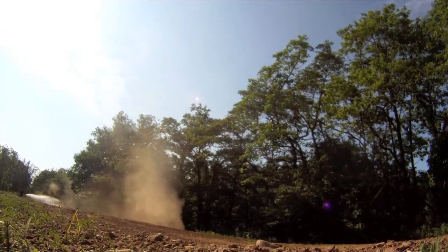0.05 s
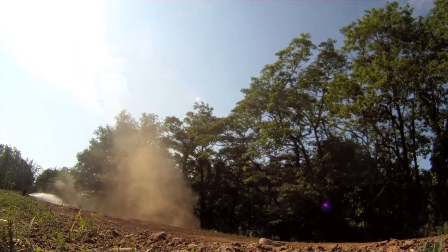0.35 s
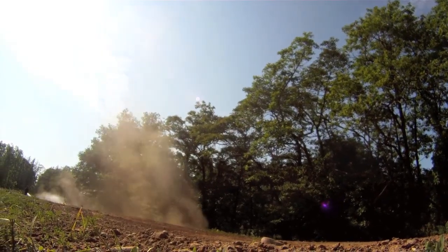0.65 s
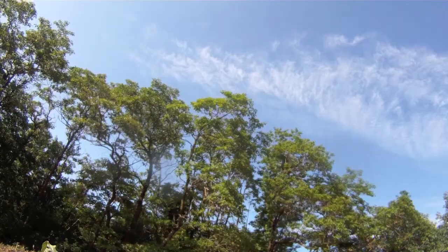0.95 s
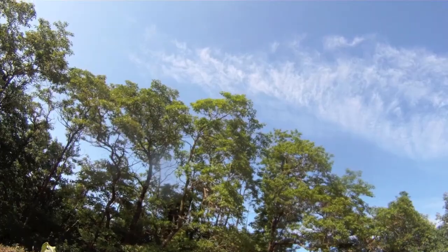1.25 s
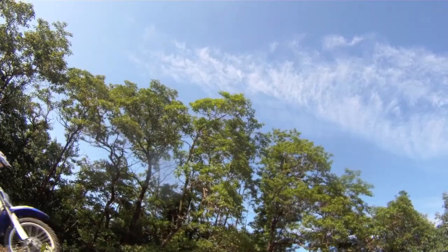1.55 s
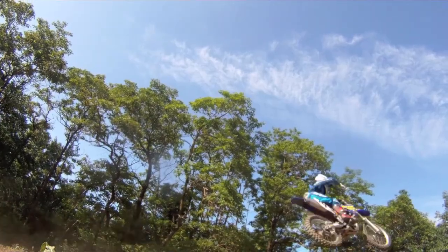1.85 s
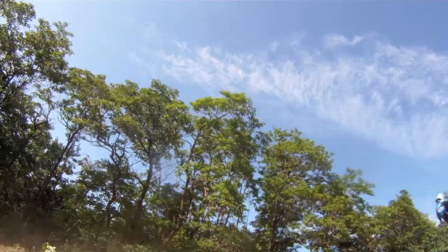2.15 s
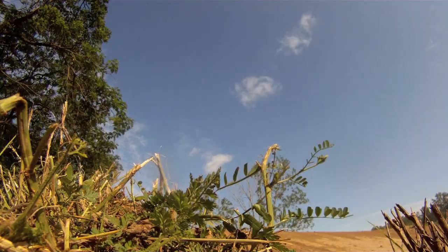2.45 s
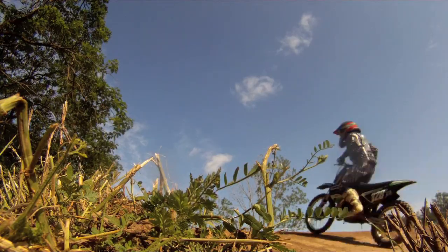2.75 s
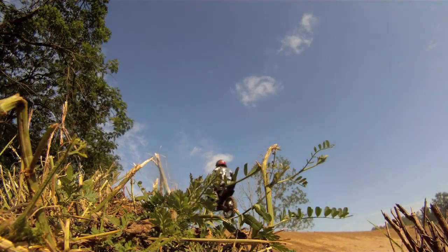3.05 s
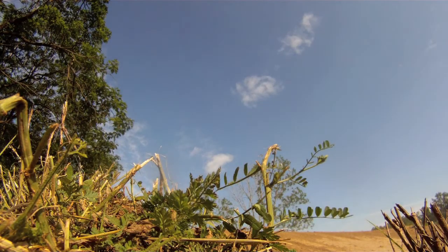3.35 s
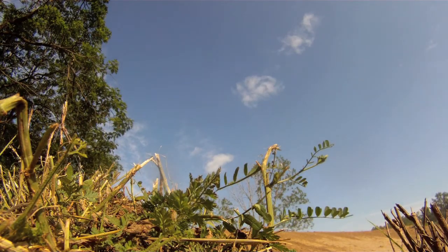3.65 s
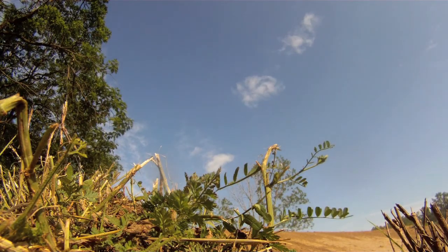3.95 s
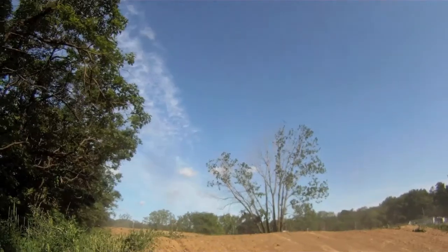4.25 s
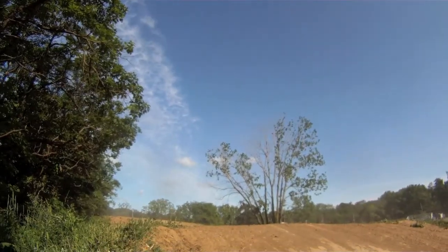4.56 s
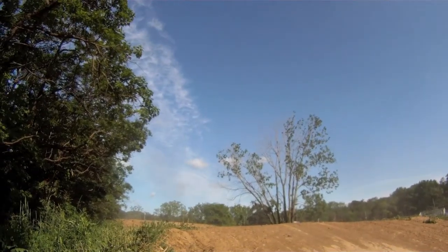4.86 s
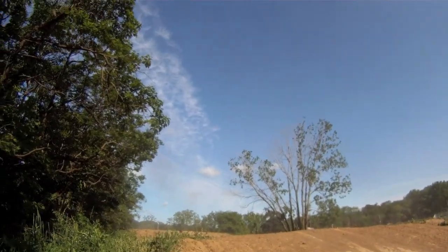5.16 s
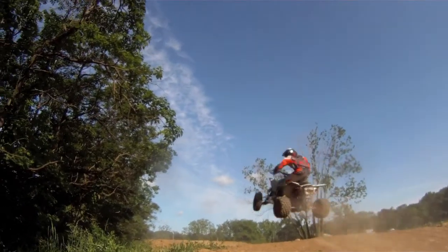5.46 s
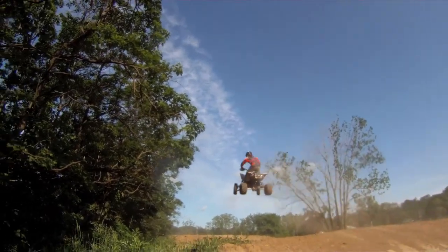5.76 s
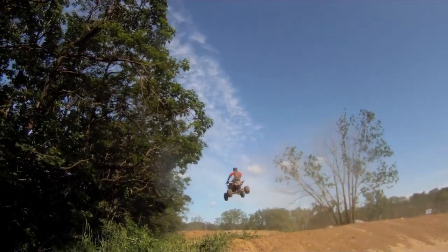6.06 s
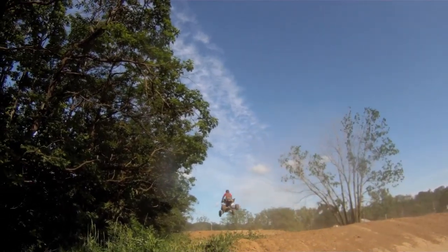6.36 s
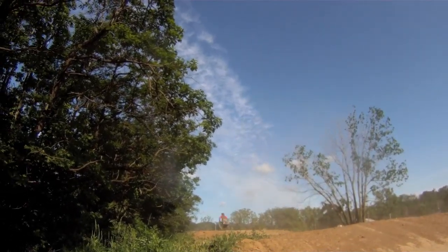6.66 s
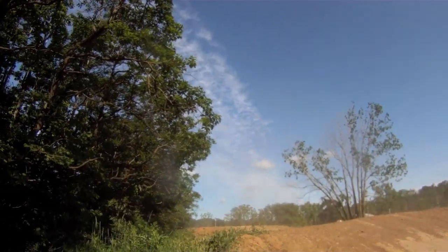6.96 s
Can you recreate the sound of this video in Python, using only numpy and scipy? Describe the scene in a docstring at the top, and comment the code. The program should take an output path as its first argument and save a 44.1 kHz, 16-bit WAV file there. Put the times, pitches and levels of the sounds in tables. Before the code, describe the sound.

Four short outdoor scenes of thumping, raspy single-cylinder engines, heard from ground level with gusts of low rumble and a faint echo from trees. First a dirt bike leaves amid pattering clods, then one knocks over a jump and winds down, and another passes at higher revs while a distant one drones. Finally a quad swells to a close roar, clacks off a ramp and pulls away, revving and popping.

```python
"""A dirt bike rolls off, blipping its throttle as clods fall. In three more short scenes a bike jumps,
one passes with another far behind, and a quad drives up, leaps and barks away. Each engine has a single
cylinder: every firing gives a low thump in the pipe and a sharp crack at its mouth, over metal clatter.
All is heard close to the ground, with rumbling air, faint scatter from a wood and a treble coloured by
the resonances of a camera's plastic case."""
import sys
import numpy as np
from scipy import signal
from scipy.fft import rfft, irfft
from scipy.io import wavfile
from scipy.ndimage import uniform_filter1d, map_coordinates

SR = 44100
rng = np.random.default_rng(int(sys.argv[2]) if len(sys.argv) > 2 else 0)


def digitize_waveform(pressure):
    """Quantize a signal to 16-bit integers and store it at the path in sys.argv[1].

    Rows of a 2-D input are taken as channels; values are limited to [-1, 1].
    """
    field = np.atleast_2d(pressure).T
    bounded = np.clip(field, -1, 1)
    quanta = np.round(bounded * 32767).astype(np.int16)
    wavfile.write(sys.argv[1], SR, quanta)


N = 313992
T = np.arange(N) / SR
HZ = np.fft.rfftfreq(8192, 1 / SR)

# Swells of ground rumble and wind. Each row: centre in seconds, level in dB, half width in seconds.
RUMBLE_SWELLS = [(0.02, -27.5, 0.06), (1.35, -36.5, 0.051), (2.66, -49, 0.13), (4.28, -43, 0.082),
                 (5.12, -33.5, 0.25), (6.4, -46, 0.46)]
# Spectrum of the rumble. Each row: frequency in Hz, relative gain in dB.
RUMBLE_SPECTRUM = [(15, -27), (35, -13), (75, -4), (130, -5.5), (250, -11), (700, -43)]
# Clods and stones landing. Each row: start in seconds, peak in dB, nominal pitch in Hz.
CLOD_FALLS = [(.125, -14.5, 1050), (.180, -17.5, 1110), (0.292, -23, 1130), (0.343, -30, 1200),
              (.387, -27.5, 1080), (.532, -23.5, 1000), (0.54, -27.5, 1040), (0.597, -31, 1160),
              (0.848, -47, 1100)]
# Wheels hitting the ramp. Each row: start in seconds, thud level in dB, thud pitch in Hz,
# thud decay in seconds, clack peak in dB.
RAMP_HITS = [(1.327, -30, 115, 0.021, -16.5), (1.35, -20.5, 91, 0.024, -42), (5.191, -19, 122, 0.025, -9.5)]
# Resonances of the case. Each row: frequency in Hz, nominal width in Hz, relative gain in dB.
CASE_MODES = [(7090, 1060, -8.5), (8360, 830, -4.5), (8870, 280, -4), (9650, 210, 4), (9880, 480, 3),
              (10830, 170, -5), (11490, 570, -14.5), (12350, 300, -32.5), (13130, 250, -6.5),
              (14500, 630, -12), (14200, 680, 1), (15000, 380, -18)]
# Engine speeds. Each row: time in seconds, firings per second.
ROLLING_RATE = [(0, 54.3), (.19, 52.4), (.32, 47.1), (.55, 40.8), (.63, 44.2), (.73, 44.5), (.87, 49.3),
                (.945, 48.5)]
JUMPING_RATE = [(.945, 97.3), (1.1, 84.4), (1.28, 72.8), (1.4, 88.6), (1.48, 85.3), (1.75, 64.2),
                (1.98, 51), (2.37, 37.1), (2.445, 42)]
PASSING_RATE = [(2.445, 129.2), (2.55, 123), (2.78, 107.7), (2.85, 100.7), (2.97, 99.1), (3.1, 93.7),
                (3.55, 83.14), (4.075, 76.6)]
FAR_RATE = [(2.445, 87), (3.03, 91.9), (3.14, 98.2), (3.26, 72.4), (3.38, 60.1), (3.57, 78.1),
            (3.73, 71.05), (3.86, 83), (4.075, 76.7)]
QUAD_IN_RATE = [(4.075, 97), (4.26, 97.4), (4.41, 86), (4.7, 86), (4.83, 84.6), (5.04, 87.7), (5.22, 75),
                (5.39, 61.3), (5.465, 68.9)]
QUAD_OUT_RATE = [(5.451, 67), (5.527, 74), (5.6, 85), (5.76, 78.3), (6.06, 60.4), (6.21, 92), (6.44, 91),
                 (6.51, 85), (6.65, 92.4), (6.82, 92.8), (6.89, 70), (6.97, 74.5), (7.12, 76)]
# Rides as they near and leave. Each row: time in seconds, base thump level in dB, base rasp level in dB,
# exhaust share of the rasp from 0 to 1 (high when the pipe faces the listener).
ROLLING_RIDE = [(0, -40.5, -33, 1), (.09, -33.5, -37, 0.42), (.21, -33.5, -38, .5), (.42, -38, -52.5, 0.42),
                (.6, -41, -54.5, .25), (.74, -41, -54.5, 0.75), (.85, -42, -53.5, 0.39),
                (.94, -42, -46, 0.21)]
JUMPING_RIDE = [(.95, -41, -38, 0.14), (1.28, -40, -35, 0.27), (1.46, -31.5, -32, .03),
                (1.62, -30, -32.5, .02), (1.77, -33.5, -34, .08), (1.96, -36, -43, .12),
                (2.16, -41.5, -52.5, .03), (2.36, -46, -57.5, .06), (2.445, -33, -46, 0.089)]
PASSING_RIDE = [(2.45, -53, -37, .1), (2.54, -36.5, -34, 0.18), (2.82, -56, -42, 0.38),
                (3.1, -80, -42.5, .24), (3.23, -76, -51.5, .08), (3.45, -74, -54.5, .08),
                (4.07, -63, -55, 0.16)]
QUAD_IN_RIDE = [(4.08, -48, -36, 0.071), (4.4, -41, -36.5, 0.042), (4.72, -34, -36, 0.048),
                (4.94, -31, -26, .06), (5.09, -23.5, -20.5, .06), (5.22, -11.5, -20, .08),
                (5.256, -23, -20, .84), (5.421, -15.5, -21.5, 0.76), (5.455, -29, -34, .8)]
QUAD_OUT_RIDE = [(5.45, -28, -25, 0.94), (5.63, -35.5, -22.5, 0.95), (5.74, -30.5, -21, 0.75),
                 (5.93, -32.5, -32, 0.57), (6.15, -32, -28, 0.9), (6.33, -36.5, -29.5, 0.82),
                 (6.522, -29.5, -26.5, .55), (6.739, -34, -37.5, 0.11), (6.902, -34, -33.5, 0.03),
                 (7.12, -34, -35, 0.012)]
# Responses of silencer and pipe. Each row: frequency in Hz, relative gain in dB.
ROLLING_EXHAUST = [(24, -64), (40, -11), (113, -9.5), (160, 2.5), (358, -8.5), (458, -16), (527, -12.5),
                   (664, -18.5), (728, -13.5), (904, -15.5), (1050, -9), (1370, -20), (1600, -19.5),
                   (2080, -56), (3520, -120)]
JUMPING_EXHAUST = [(24, -68), (40, -36), (70, -12), (98, -13), (146, 3), (280, -18.5), (326, -10.5),
                   (431, -20.5), (503, -14.5), (717, -14.5), (824, -19.5), (1050, -7.5), (1600, -23.5),
                   (2080, -52), (3520, -120)]
PASSING_EXHAUST = [(40, -8), (75, 18), (150, -15), (230, 0), (290, -5), (400, 8.5), (500, -4), (690, -4.5),
                   (900, -13.5), (1190, -2), (1500, -23)]
FAR_EXHAUST = [(40, -17), (75, -6), (120, -2.5), (180, 4.5), (270, -2.5), (400, -19), (900, -20),
               (2000, -49)]
QUAD_IN_EXHAUST = [(40, -40), (62, -41), (82, -3), (118, -10.5), (165, 0), (205, 7), (300, -1.5),
                   (350, -3.5), (430, -3), (540, -10), (800, -9.5), (1040, -13.5), (1290, -18.5),
                   (1600, -13)]
QUAD_OUT_EXHAUST = [(24, -80), (40, -53), (75, -9.5), (120, -1), (176, 4), (209, 6.5), (369, 2.5),
                    (634, -6), (775, -9), (947, -10), (1010, 0.5), (1120, -9), (1480, -10.5), (1600, -6.5),
                    (2080, -4), (3520, -120)]
# Bright ring of each machine. Each row: frequency in Hz, relative gain in dB.
ROLLING_METAL = [(820, -36), (1400, -23), (1660, -11), (1830, -20), (2010, 5), (2130, 2), (2470, 1.5),
                 (2720, -21), (3070, -3), (3320, -13), (3820, -6), (4190, -21), (5280, -18.5), (6000, -45),
                 (7800, -76), (13200, -120)]
JUMPING_METAL = [(820, -51), (1400, -4.5), (1760, -10), (2050, 3.5), (2260, 6), (2570, -1.5), (2790, -9),
                 (3220, -9), (3640, -7), (4090, -15), (4400, -12.5), (4790, -17), (5220, -12), (6000, -26),
                 (7800, -44), (13200, -120)]
PASSING_METAL = [(820, -64), (1400, -11), (1520, -24), (1690, -3.5), (1830, -15), (1960, -5.5), (2070, 3.5),
                 (2360, -5.5), (2560, -12.5), (2750, -25), (2890, -16.5), (3620, -12.5), (4160, -24),
                 (5220, -22.5), (6000, -40), (7800, -74), (13200, -120)]
QUAD_IN_METAL = [(820, -65), (1400, -14), (1590, -10.5), (1880, 5.5), (2040, 6.5), (2320, 5.5),
                 (2560, -2.5), (2740, -11.5), (3280, -3.5), (3890, -9.5), (4240, -15), (5060, -14),
                 (6000, -32), (7800, -73), (13200, -120)]
QUAD_OUT_METAL = [(820, -64), (1400, -11), (1520, -15), (1650, -1.5), (1760, -1), (1990, 0.5), (2280, -5),
                  (2560, -2), (2800, -15.5), (3130, -10), (3550, -16.5), (5090, -24.5), (5580, -26),
                  (6000, -36), (7800, -99), (13200, -120)]
# Uneven combustion. Each entry: name of the ride, base roughness from 0 to 1.
ROUGHNESS = {"rolling": .25, "jumping": .3, "passing": .68, "quad in": .5, "quad out": .38}
# Exhaust bangs. Each row: time in seconds, nominal boost in dB, span of misfiring before it in seconds.
EXHAUST_BANGS = [(.762, 4.5, 0), (5.2536, 2, 0), (5.2684, 2, 0), (5.481, 5, 0), (5.495, 7.5, 0),
                 (5.523, 6, 0), (5.597, 4, 0), (5.634, 2, .028), (6.028, 10, 0), (6.091, 3.5, .05),
                 (6.136, 3, 0), (6.217, 5.5, .016), (6.2504, 9, .016), (6.285, 5.5, .029), (6.362, 3, .016),
                 (6.394, 6.5, .016), (6.427, 4.5, .016), (6.449, 5.5, .018), (6.471, 7, .016)]
# Throttle twists. Each row: opening time and shutting time in seconds, lift of the rasp in dB,
# depth of the preceding stumble in dB (a swell if negative).
TWISTS = [(-.03, 0.019, 9.5, -7), (.67, 0.852, 8.5, 5), (1.3, 1.376, 1, 1), (4.172, 4.29, 6.5, -1.5),
          (4.574, 4.846, 2, -1), (5.004, 5.112, 0.5, -0.5), (5.238, 5.251, 8.5, 5), (5.46, 5.598, 8.5, 1.5),
          (5.654, 5.748, 2, 3), (6.104, 6.259, 11.5, 0.5), (6.28, 6.805, 6, -1)]
# Changes of scene. Each entry: time in seconds.
SCENE_CHANGES = [.946, 2.445, 4.079]


def amp(db):
    """Amplitude ratio of a level in decibels."""
    return 10 ** (np.asarray(db) / 20)


def unit_rms(x):
    """Normalisation to unit power."""
    return x / np.sqrt(np.mean(x ** 2) + 1e-20)


def curves(rows, t):
    """Linear interpolation of a table's columns at the times t."""
    s, *columns = np.transpose(rows)
    return [np.interp(t, s, c) for c in columns]


def response(points):
    """Magnitude response through (Hz, dB) points on logarithmic axes."""
    hz, db = np.transpose(points)
    return amp(np.interp(np.log(HZ + 1), np.log(hz), db))


def band(lo_hz, hi_hz, order=8):
    """Magnitude response of a band-pass filter."""
    return 1 / np.sqrt((1 + (lo_hz / (HZ + 1)) ** (2 * order)) * (1 + (HZ / hi_hz) ** (2 * order)))


def colour(x, gain):
    """Minimum-phase filtering: ringing follows the pulse that excites it. The result has rms 1."""
    cepstrum = irfft(np.log(np.maximum(gain / gain.max(), 1e-5)))
    half = len(cepstrum) // 2
    cepstrum[1:half] *= 2
    cepstrum[half + 1:] = 0
    impulse_response = irfft(np.exp(rfft(cepstrum)))[:half]
    return unit_rms(signal.oaconvolve(x, impulse_response)[:len(x)])


def add(mix, s, sound):
    """Superposition of a sound starting at s seconds."""
    part = mix[max(0, round(s * SR)):][:len(sound)]
    part += sound[:len(part)]


def clicks(t, times, sizes):
    """An impulse train on the time axis t."""
    at = np.round((times - t[0]) * SR).astype(int)
    return np.bincount(np.maximum(at, 0), sizes, len(t))[:len(t)]


def blend(pulses, noise, share):
    """Uncorrelated signals add in power: the pulses take the given share, noise the rest."""
    share = np.clip(share, .01, .995)
    return np.sqrt(share) * unit_rms(pulses) + np.sqrt(1 - share) * unit_rms(noise)


def case_response(round_trip_s=.0016, echo=.27):
    """Treble modes of the case, rippled by interference with sound running round its shell."""
    power = sum(amp(db) ** 2 / (1 + ((HZ - hz) / (.64 * width)) ** 2) ** 2
                for hz, width, db in CASE_MODES)
    return np.sqrt(power) * band(4900, 18800) / abs(1 - echo * np.exp(-2j * np.pi * HZ * round_trip_s))


def trees(x, t60=.66):
    """Reverberation: scatter from the edge of the wood decays exponentially."""
    t = T[:SR]
    envelope = amp(-60 * t / t60) * (1 - np.exp(-t / .0028))
    tail = colour(rng.standard_normal(SR) * envelope, band(200, 2500, order=1))
    return signal.fftconvolve(x, tail / np.linalg.norm(tail))[:N]


def rumble(floor_db=-54):
    """Ground rumble and wind on the case: low noise under slow amplitude modulation."""
    swells = sum(amp(db) / (1 + ((T - s) / width) ** 2) for s, db, width in RUMBLE_SWELLS)
    return np.hypot(amp(floor_db), swells) * colour(rng.standard_normal(N), response(RUMBLE_SPECTRUM))


def knock(gain, decay_s):
    """Impact excitation: a dying burst of contact noise filtered by a body; peak 1."""
    t = T[:SR // 8]
    sound = colour(rng.standard_normal(len(t)) * np.exp(-t / decay_s), gain)
    return sound / abs(sound).max()


def clods():
    """Thrown clods land on the dirt as heavily damped impacts."""
    out = np.zeros(N)
    for s, db, hz in CLOD_FALLS:
        body = band(.7 * hz, .95 * hz, order=3) + .053 * band(2100, 2300)
        add(out, s, amp(db) * knock(body, decay_s=.00095))
    return out


def ramp_hits():
    """Wheels striking the ramp excite a damped low oscillation and a metal clack."""
    out, t = np.zeros(N), T[:SR // 3]
    metal = response(QUAD_IN_METAL) + .25 * case_response() + .11 * band(3000, 8000, order=3)
    for s, db, hz, decay_s, clack_db in RAMP_HITS:
        envelope = np.exp(-t / decay_s) * (1 - np.exp(-t / .003))
        add(out, s, amp(db) * np.sin(2 * np.pi * hz * t) * envelope)
        add(out, s + .0015, amp(clack_db) * knock(metal, decay_s=.0042))
    return out


def firings(rate, bangs=()):
    """Phase is the integral of rate: one firing per cycle, shifted so that each bang falls on one."""
    t = np.arange(rate[0][0], rate[-1][0], 1 / SR)
    hz, = curves(rate, t)
    cycles = np.cumsum(hz) / SR
    anchors = [t[0]] + [row[0] for row in bangs]
    offsets = np.unwrap(np.interp(anchors, t, cycles) % 1, period=1)
    cycles -= np.interp(t, anchors, offsets)
    fired = np.interp(np.arange(int(cycles[-1]) + 1), cycles, t)
    return t, hz, cycles, fired


def far_bike(level_db=-54):
    """Of a distant bike's pulse train only the low harmonics carry. Returns start time and sound."""
    t, _, _, fired = firings(FAR_RATE)
    pulses = clicks(t, fired, amp(1.1 * rng.standard_normal(len(fired))))
    source = blend(pulses, rng.standard_normal(len(t)), .995)
    return t[0], amp(level_db) * colour(source, response(FAR_EXHAUST))


def reflected(x, ground_s, slap_gain, slap_s=.0047):
    """Comb filtering: a ground reflection and a second slap interfere with the direct sound."""
    bounce, slap = (map_coordinates(x, [np.arange(len(x)) - s * SR], order=3) for s in (ground_s, slap_s))
    return x + .14 * bounce + slap_gain * slap


def scattered(x, spread_s=.009):
    """Multipath arrival scrambles phase: the harmonics stay, the pulse edges blur."""
    t = T[:4096]
    paths = rfft(rng.standard_normal(len(t)) * np.exp(-t / spread_s))
    all_pass = np.roll(irfft(paths / abs(paths)), 128)
    return unit_rms(signal.oaconvolve(x, all_pass)[128:][:len(x)])


def dopplered(x, gain, ratio):
    """Doppler effect: the resonances that colour x slide by the given frequency ratio."""
    heard = np.arange(len(x))
    emitted = np.cumsum(ratio) - ratio[0]
    arrivals = np.interp(np.arange(int(emitted[-1]) + 2), emitted, heard)
    at_source = map_coordinates(x, [arrivals], order=3)
    return map_coordinates(colour(at_source, gain), [emitted], order=3)


def throttle(t, open_s=.027, shut_s=.052, stumble_lead_s=.028, stumble_s=.044):
    """The throttle modulates level. Returns its opening (0-1), lift (dB) and preceding stumble (dB)."""
    opening, lift, dip = np.zeros((3, len(t)))
    for opens, shuts, lift_db, stumble_db in TWISTS:
        twist = np.clip(np.minimum((t - opens) / open_s, 1 - (t - shuts) / shut_s), 0, 1)
        opening, lift = np.maximum(opening, twist), np.maximum(lift, lift_db * twist)
        dip += stumble_db * np.exp(-((t - opens + stumble_lead_s) / stumble_s) ** 2)
    return opening, lift, dip


def misfiring(fired, bangs, miss_db=-22):
    """Afterfire, mostly of fuel left by missed firings. Returns each firing's nominal boost in dB."""
    db = np.zeros(len(fired))
    for s, bang_db, gap in bangs:
        db[(fired > s - gap) & (fired < s)] = miss_db
        db[np.argmin(abs(fired - s))] = bang_db
    return db


def combustion(t, hz, fired, bangs, rough):
    """Cycle-to-cycle variation: roughness scatters the size and timing of the thumps and cracks."""
    bang_db = misfiring(fired, bangs)
    spread = np.interp(fired, t, rough) * (bang_db == 0)
    force, slip, snap = rng.standard_normal((3, len(fired))) * spread
    fired = fired + .011 * slip / np.interp(fired, t, hz)
    thump_size = amp(2.6 * force + .33 * bang_db)
    crack_size = amp(2.6 * (force + .9 * snap) + bang_db)
    crack_size /= np.sqrt(uniform_filter1d(crack_size ** 2, size=11))  # evens power over 11 firings
    thumps = clicks(t, fired, thump_size) / np.sqrt(hz)
    cracks = clicks(t, fired, crack_size) / np.sqrt(hz)
    return thumps, unit_rms(cracks)


def gas_jet(cracks, decay_s=.002):
    """Turbulence: a short jet of noisy gas follows each pressure front."""
    envelope = signal.lfilter([1], [1, -np.exp(-1 / (decay_s * SR))], cracks)
    return unit_rms(envelope * rng.standard_normal(len(cracks)))


def valve_clatter(cycles, throb, impacts_per_s=1400):
    """Valve and chain noise: small random impacts, amplitude-modulated by the turning crank."""
    n = len(cycles)
    swell = np.exp(throb * (np.cos(4 * np.pi * cycles) + .5 * np.cos(2 * np.pi * (cycles - .2))))
    impacts = rng.standard_normal(n) * (rng.random(n) < impacts_per_s / SR)
    return unit_rms(swell * (unit_rms(impacts) + 1.9 * rng.standard_normal(n)))


def engine(rate, ride, exhaust, metal, roughness, nearest_s, doppler, bounce_s, climb, slap,
           bark_db, bark_follows, growl_db, growl_follows, fizz_db, spit, throb):
    """Source and filter: firings and clatter excite five bands. Returns start time and sound.
    Bark and growl follow the swings of (thump, rasp, throttle lift) by the given weights."""
    bangs = [row for row in EXHAUST_BANGS if ride[0][0] < row[0] < ride[-1][0]]
    t, hz, cycles, fired = firings(rate, bangs)
    thump_db, rasp_db, facing = curves(ride, t)
    opening, lift_db, dip_db = throttle(t)
    swings = np.array([thump_db - thump_db.mean(), rasp_db - rasp_db.mean(), lift_db])
    rough = roughness * (1 - .7 * facing) + .38 * opening  # cleaner from straight behind the pipe
    ratio = 1 - doppler * np.tanh((t - nearest_s) / .52)  # swings from coming to going
    ground_s = bounce_s * np.exp(climb * (t - nearest_s))  # the delay grows as the rider climbs
    paths = ground_s, slap * facing * (1 - opening)

    thumps, cracks = combustion(t, hz, fired, bangs, rough)
    jet = gas_jet(cracks)
    clatter = valve_clatter(cycles, throb)
    pulses = blend(thumps, scattered(thumps), 2 * facing - .55)  # indirect when the pipe points away

    pipe = response(exhaust)
    thump = colour(blend(thumps, clatter, 1 - .16 * rough ** 2), pipe * band(52, 244.4, order=5))
    bark = colour(blend(pulses, clatter, 1 - .275 * rough ** 2), pipe * band(250, 810, order=5))
    growl_drive = reflected(blend(pulses, clatter, 1 - .55 * rough), *paths)
    growl = dopplered(growl_drive, pipe * band(730, 1497, order=5), ratio)
    rasp_drive = reflected(blend(cracks + spit * jet, clatter, facing), *paths)
    rasp = dopplered(rasp_drive, response(metal) * band(1325, 5460), ratio)
    fizz_drive = reflected(blend(cracks + 4.1 * jet, clatter, .97 * facing), *paths)
    fizz = colour(fizz_drive, case_response())

    out = -amp(thump_db + .51 * lift_db) * thump
    out += amp(bark_db + np.dot(bark_follows, swings)) * bark
    out += amp(growl_db + np.dot(growl_follows, swings)) * growl
    out += amp(rasp_db + lift_db) * (rasp + amp(fizz_db) * fizz)
    return t[0], out * amp(-dip_db)


def scene():
    """Superposition of the successive rides, the rumble, the impacts and their scatter from the wood."""
    mix = np.zeros(N)
    add(mix, *engine(ROLLING_RATE, ROLLING_RIDE, ROLLING_EXHAUST, ROLLING_METAL, ROUGHNESS["rolling"],
                     nearest_s=0, doppler=.0042, bounce_s=.0019, climb=0, slap=.15,
                     bark_db=-42.5, bark_follows=(.6, .35, 1.1),
                     growl_db=-44.5, growl_follows=(.2, .7, .8), fizz_db=-8, spit=.32, throb=.23))
    add(mix, *engine(JUMPING_RATE, JUMPING_RIDE, JUMPING_EXHAUST, JUMPING_METAL, ROUGHNESS["jumping"],
                     nearest_s=1.55, doppler=.021, bounce_s=.000923, climb=.39, slap=.1,
                     bark_db=-43, bark_follows=(.45, .6, .1),
                     growl_db=-43, growl_follows=(.45, .75, .3), fizz_db=-9, spit=1, throb=.048))
    add(mix, *engine(PASSING_RATE, PASSING_RIDE, PASSING_EXHAUST, PASSING_METAL, ROUGHNESS["passing"],
                     nearest_s=2.7, doppler=.006, bounce_s=.00185, climb=.14, slap=.085,
                     bark_db=-62.5, bark_follows=(.1, .9, 0),
                     growl_db=-58, growl_follows=(.2, .85, 0), fizz_db=-10.5, spit=1, throb=.073))
    add(mix, *engine(QUAD_IN_RATE, QUAD_IN_RIDE, QUAD_IN_EXHAUST, QUAD_IN_METAL, ROUGHNESS["quad in"],
                     nearest_s=5.3, doppler=.004, bounce_s=.00088, climb=.33, slap=.58,
                     bark_db=-31.5, bark_follows=(.3, .1, .7),
                     growl_db=-35, growl_follows=(.3, .35, .55), fizz_db=-9.5, spit=1, throb=.049))
    add(mix, *engine(QUAD_OUT_RATE, QUAD_OUT_RIDE, QUAD_OUT_EXHAUST, QUAD_OUT_METAL,
                     ROUGHNESS["quad out"], nearest_s=5.6, doppler=.005, bounce_s=.000988, climb=.058,
                     slap=.58, bark_db=-31.5, bark_follows=(.6, .05, .4),
                     growl_db=-37, growl_follows=(.3, .25, 1.05), fizz_db=-11, spit=1, throb=.013))
    add(mix, *far_bike())
    mix += rumble() + clods() + ramp_hits()
    return (mix + amp(-23) * trees(mix))[None]


def record(dry):
    """Brief fades separate the scenes, overload clips the hardest bangs, a low-pass limits the band."""
    fade_out_s, fade_in_s, cutoff_hz = .11, .071, 15650
    fades = [np.clip(abs(T - s) / np.where(T < s, fade_out_s, fade_in_s), .03, 1) for s in SCENE_CHANGES]
    clipped = np.clip(dry * np.prod(fades, axis=0), -1, 1)
    low_pass = signal.firwin(301, cutoff_hz, window=("kaiser", 9), fs=SR)
    return signal.oaconvolve(clipped, low_pass[None], "same")


dry = scene()
out = record(dry)
digitize_waveform(out)
```